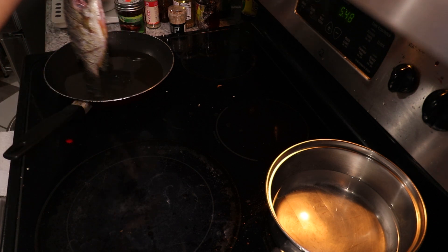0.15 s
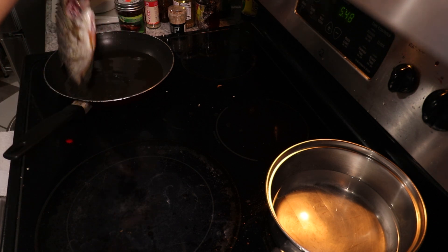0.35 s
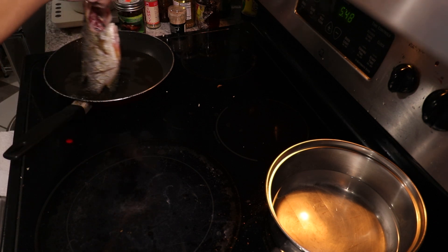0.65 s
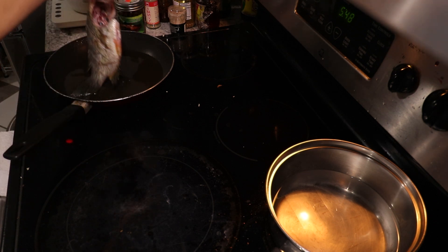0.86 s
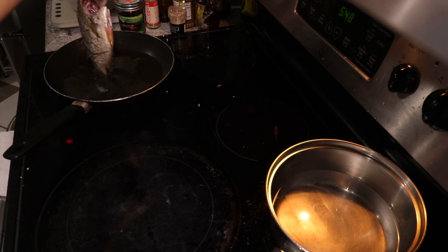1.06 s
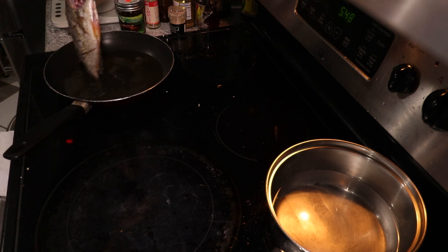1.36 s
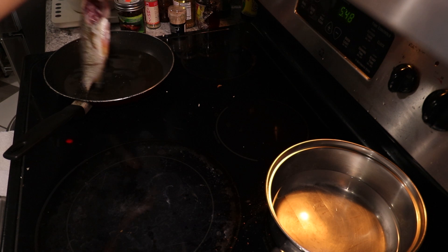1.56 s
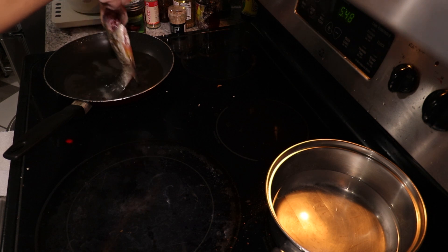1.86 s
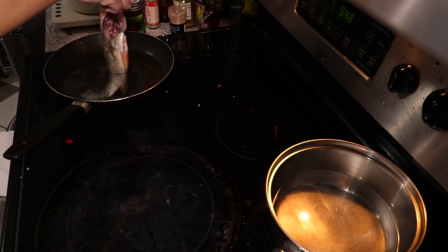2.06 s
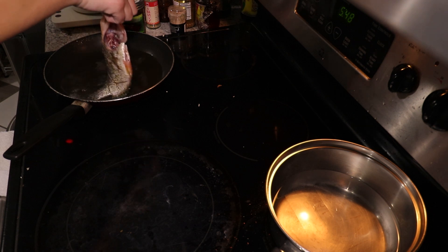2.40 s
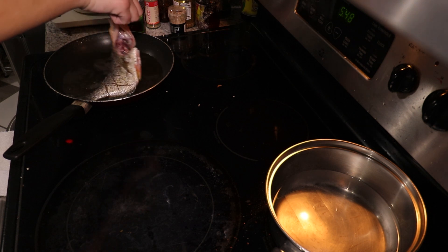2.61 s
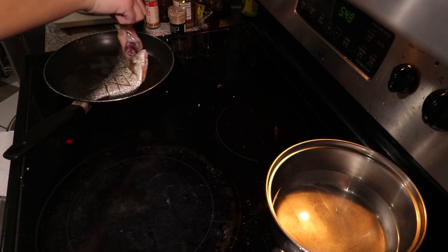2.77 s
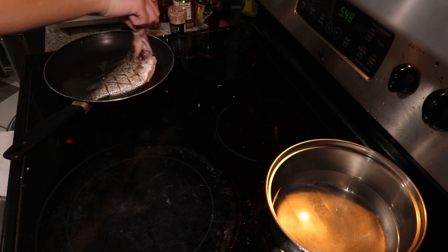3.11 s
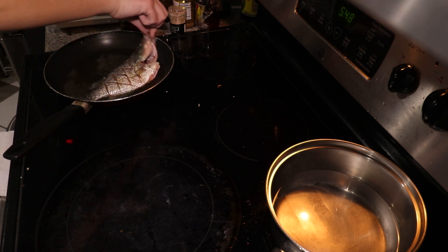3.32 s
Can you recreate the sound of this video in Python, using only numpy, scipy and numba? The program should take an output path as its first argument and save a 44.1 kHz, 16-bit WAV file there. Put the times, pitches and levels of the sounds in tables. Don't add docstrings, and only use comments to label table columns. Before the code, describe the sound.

Hot oil sizzles as a fish is lowered into a pan. Faint hiss and small ticks come first; from 0.5 to 1.35 s crackling swells with sharp pops, then nearly stops around 1.4-1.6 s. Scattered spits return, and at 1.95 s a loud sizzle surges and holds to the end at 3.4 s, with gurgling steam, dense bright snaps, slight metallic pan ring, short kitchen reflections and very faint hum.

```python
import sys
import numpy as np
from scipy import signal
from scipy.fft import rfft, irfft
from scipy.io import wavfile
from numba import njit

SR = 44100
rng = np.random.default_rng(int(sys.argv[2]) if len(sys.argv) > 2 else 0)


def level_to_linear(level):
    exponent = np.asarray(level, float) / 20
    return 10 ** exponent


def persist_wave(psi):
    counts = np.round(np.clip(psi, -1, 1) * 32767).astype(np.int16)
    wavfile.write(sys.argv[1], SR, np.atleast_2d(counts).T)


N = 152145
PLACES = 6

# start_s, level_db, pitch_hz, spread_octaves
SKIN_BOIL = [(0, -41, 3540, 0.63), (.13, -46, 6500, 0.75), (.25, -44, 6600, 0.085), (.45, -56, 5660, 0.08),
             (.575, -39, 3800, 0.6), (.9, -37, 3430, 0.38), (1.15, -38.5, 3970, 0.62),
             (1.24, -40.5, 5760, 0.7), (1.42, -56.5, 5130, 0.69), (1.58, -60, 4740, 0.22),
             (1.7, -45.5, 3120, 0.87), (1.86, -43, 4000, 0.63), (1.95, -30, 3060, 0.74),
             (2.2, -31.5, 4300, 0.54), (2.38, -34, 4200, 0.63), (2.6, -33, 3160, 0.74),
             (3.0, -34, 3580, 0.86), (3.45, -33.5, 3500, 0.85)]


def in_time(rows, t):
    s, *columns = np.transpose(rows)
    return [np.interp(t, s, c) for c in columns]


def rms_one(x):
    return x / np.sqrt(np.mean(x ** 2) + 1e-20)


def drift(rate_hz):
    r = np.exp(-2 * np.pi * rate_hz / SR)
    settle = 8000
    noise = rng.standard_normal(N + settle)
    return rms_one(signal.lfilter([1], [1, -2 * r, r * r], noise)[settle:])


@njit
def add(out, place, start, hz, size, cycles, rise):
    for k in range(len(start)):
        w = 2 * np.pi * hz[k] / SR
        n = int(cycles * SR / hz[k]) + 2
        fall = np.exp(-6.9 / n)
        swell = np.exp(-.7 * hz[k] / SR)
        level, unswollen, phase = size[k], 1.0, 0.0
        for i in range(min(n, out.shape[1] - start[k])):
            out[place[k], start[k] + i] += level * (1 - unswollen) * np.sin(phase)
            phase += w * (1 + rise * i / n)
            level *= fall
            unswollen *= swell


def volleys(s, db, hz, spread, dies_s, cycles, count):
    s, db, hz, spread = (np.broadcast_to(v, np.shape(s))[:, None] for v in (s, db, hz, spread))
    late = rng.exponential(1, (len(s), count)) * (np.arange(count) > count // 4)
    detune = np.clip(rng.standard_normal(late.shape), -1.5, 1.5)
    pitch = np.clip(hz * 2 ** (np.abs(spread) * detune), 200, .4 * SR)
    size = level_to_linear(db - 2.25 * late) * rng.choice([-1, 1], late.shape) / np.sqrt(count)
    start = np.clip((s + dies_s * late) * SR, 0, N - 1).astype(np.int64)
    place = np.repeat(np.arange(len(s)) % PLACES, count)
    out = np.zeros((PLACES, N))
    add(out, place, start.ravel(), pitch.ravel(), size.ravel(), cycles, .1)
    return out


def swarm(per_s, control, uneven_db, clump_db, cycles, crackle_db, dies_s, crackle_oct):
    out = 0
    for share, count, lift_db, most in (1, 1, 0, 3), (.03, 8, crackle_db, 1.6):
        t = rng.uniform(0, N / SR, int(share * per_s * N / SR))
        level_db, hz, spread = control(t)
        size_db = uneven_db * np.minimum(rng.exponential(1, len(t)), most)
        size_db = size_db + clump_db * drift(19)[(t * SR).astype(int)]
        hz = hz * 2 ** (np.abs(spread) * np.clip(rng.standard_normal(len(t)), -2, 2))
        even_db = 10 * np.log10(np.mean(level_to_linear(2 * size_db)) * per_s * cycles / 60 / hz)
        burst_db = level_db + size_db - even_db + lift_db
        out = out + volleys(t, burst_db, hz, crackle_oct * (count > 1), dies_s, cycles, count=count)
    return out


def sizzle():
    return swarm(5000, lambda t: in_time(SKIN_BOIL, t), uneven_db=6.0, clump_db=1.74, cycles=10.0,
                 crackle_db=15, dies_s=0.0033, crackle_oct=0.18)


def pocket():
    # start_s, level_db, pitch_hz
    pocket_curve = [(0, -53.5, 1380), (.2, -71, 1230), (.52, -88, 1200), (.6, -51, 1110), (1.02, -41, 1210),
                    (1.12, -56, 1300), (1.6, -81, 1140), (1.85, -61, 1130), (1.95, -48.5, 1470),
                    (2.12, -32, 1120), (2.25, -37, 1010), (2.35, -41, 900), (2.47, -43.5, 1160),
                    (2.7, -39.5, 1510), (3.33, -40, 1284), (3.345, -25, 1540), (3.45, -29.5, 1300)]
    spread_oct = 0.16
    return swarm(700, lambda t: in_time(pocket_curve, t) + [spread_oct], uneven_db=4, clump_db=2.5,
                 cycles=14.0, crackle_db=6, dies_s=.005, crackle_oct=.15)


def mist():
    # start_s, level_db
    mist_curve = [
        (0.0, -48.5),
        (0.39, -56),
        (0.83, -46.5),
        (1.16, -49.5),
        (1.41, -66),
        (1.66, -56),
        (2.12, -45),
        (2.71, -43.5),
        (3.45, -48.5),
    ]
    pitch_hz, spread_oct = 10600, 0.53
    return swarm(9000, lambda t: in_time(mist_curve, t) + [pitch_hz, spread_oct], uneven_db=-1.5,
                 clump_db=-2.5, cycles=10.0, crackle_db=16, dies_s=0.0045, crackle_oct=0.15)


def simmer():
    def boil(t):
        level_db = -58 + 1.5 * (in_time(SKIN_BOIL, t)[0] + 35)
        return [level_db, 420, .25]
    return swarm(700, boil, uneven_db=0.0, clump_db=3.0, cycles=10.0,
                 crackle_db=-6.0, dies_s=0.0047, crackle_oct=0.16).sum(axis=0)


def room_tone():
    # pitch_hz, level_db
    hush_colour = [(15, -40), (25, -1.5), (317, -1.5), (1700, -8), (2350, -8), (5570, -4.5), (10700, -41),
                   (14000, -7), (16000, -19)]
    hz, db = np.transpose(hush_colour)
    f = np.fft.rfftfreq(N, 1 / SR) + 1
    colour = level_to_linear(np.interp(np.log(f), np.log(hz), db))
    return level_to_linear(-57) * rms_one(irfft(rfft(rng.standard_normal(N)) * colour, N))


def pops():
    # start_s, peak_db,
    # pitch_hz, spread_octaves
    water_drops = [(0.096, -7.5, 4770, 0.6), (0.138, -4.5, 8300, 0.33), (0.518, -7.5, 9400, 0.28),
                   (0.536, -16, 7500, 0.3), (0.579, -6, 3180, 0.43), (0.636, -10.5, 2070, 0.34),
                   (0.666, -6.5, 3520, 0.28), (0.691, -3.5, 8900, 0.28), (0.742, -9, 3000, 0.59),
                   (0.762, -7, 4500, 0.43), (0.807, -14, 1270, 0.2), (0.852, -7.5, 1230, 0.33),
                   (0.897, -7, 2870, 0.32), (0.967, -18, 1210, 0.39), (1.015, -12, 3200, 0.51),
                   (1.089, -2.5, 3170, 0.1), (1.117, -12, 7000, 0.3), (1.161, -8, 2840, 0.56),
                   (1.196, 4, 5400, 0.31), (1.325, -16, 4460, 0.23), (1.346, 1, 3130, 0.28),
                   (1.628, -8, 2840, 0.34), (1.684, -6, 2860, 0.54), (1.763, -13.5, 3180, 0.7),
                   (1.777, -17, 3180, 0.58), (1.833, -14.5, 2420, 0.2),
                   (1.878, -9.5, 3150, 0.33), (1.902, -15, 2900, 0.28), (1.923, 0, 2420, 0.34),
                 (1.954, 1, 2420, 0.58), (2.003, -5.5, 2420, 0.7), (2.029, -6.5, 1330, 0.5),
                 (2.0992, 2.5, 3720, 0.57), (2.111, -11, 1216, 0.42), (2.209, 1, 1090, 0.2),
                 (2.258, 0.5, 3680, 0.33), (2.294, -10, 2390, 0.16), (2.355, -6, 3000, 0.29),
                 (2.452, -4, 2290, 0.37), (2.534, -5, 3050, 0.38), (2.567, -5, 1990, 0.45),
                 (2.581, -2, 2640, 0.5), (2.605, -1, 2740, 0.56), (2.629, -3, 4420, 0.55),
                 (2.673, 0.5, 2380, 0.55), (2.732, -15, 2070, 0.39), (2.818, 0.5, 4630, 0.36),
                 (2.892, -30, 5600, 0.34), (2.94, -14, 2950, 0.21), (2.986, 3.5, 1570, 0.41),
                 (3.093, -5, 4500, 0.2), (3.19, 1.5, 3100, 0.41), (3.266, -4.5, 2860, 0.39),
                 (3.339, 4, 1800, 0.35)]
    # start_s, peak_db, pitch_hz
    tick_drops = [
        (0.1381, -24, 8090),
        (0.5177, -23, 8850),
        (0.6908, -20, 7700),
        (1.1972, -19, 6100),
        (1.348, -3, 6300),
        (2.0712, -25, 8310),
        (2.0986, -21, 6700),
        (2.189, -23, 6600),
        (2.816, 0, 6500),
        (3.0944, -1, 6430),
    ]
    # start_s, peak_db, pitch_hz
    spit_drops = [(0.0253, -37, 15500), (0.5202, -28, 12900), (0.7083, -7, 11600), (0.7502, -15, 14900),
                  (1.1972, -32, 11000), (2.0677, -34, 11700), (2.136, -31, 11400), (2.4648, -31, 12800),
                  (2.565, -25, 14100), (2.6733, -24, 11200), (2.7287, -26, 13800), (2.8943, -23, 13800),
                  (3.2755, -21, 11800)]
    tiny_oct = .22
    spits = [(s, db + 6, hz) for s, db, hz in spit_drops]
    tiny = [(*row, tiny_oct) for row in [*tick_drops, *spits]]
    s, db, hz, spread = np.transpose([*water_drops, *tiny])
    return volleys(s, db - 9 + 8.5, hz, spread, dies_s=.003, cycles=11.6, count=16)


def snaps():
    # start_s, peak_db, pitch_hz
    skin_cracks = [(0.0773, -24.5, 4900), (0.0979, -21.5, 4800), (0.1393, -13.5, 8020), (0.519, -25, 7680),
                   (0.5786, -19, 3070), (0.6358, -14.5, 4400), (0.6687, -18.5, 3600), (0.7426, -14.5, 3030),
                   (0.7627, -14.5, 3920), (0.8082, -21, 2660), (0.8536, -16.5, 2100), (0.9686, -21.5, 2300),
                   (1.0161, -22.5, 2760), (1.0901, -22.5, 3200), (1.0982, -23, 3660), (1.2015, -11, 4700),
                   (1.3035, -25, 5900), (1.3253, -22, 4720), (1.3483, -16.5, 4570), (1.356, -23, 3380),
                   (1.6285, -22.5, 2780), (1.6845, -15.5, 1900), (1.7767, -13.5, 4070),
                   (1.8334, -28.5, 2860), (1.8816, -16, 5030), (1.8945, -14, 3800), (1.9076, -16, 3190),
                   (1.9248, -16.5, 2520), (1.9513, -17, 2780), (1.9621, -13, 2330), (2.0029, -10, 3130),
                   (2.0307, -12.5, 2120), (2.0498, -17, 1620), (2.1031, -7, 3520), (2.1108, -12, 1460),
                   (2.2131, -16, 1630), (2.2338, -9.5, 2870), (2.2619, -5, 4060), (2.295, -13.5, 2640),
                   (2.5348, -13.5, 2870), (2.5818, -13, 2970), (2.6273, -7.5, 4600), (2.6746, -7.5, 3600),
                   (2.8187, -9, 4900), (2.8258, -12, 4330), (2.8956, -14.5, 3600), (2.9414, -18, 2700),
                   (2.9873, -7.5, 1480), (2.9937, -15, 1750), (3.0941, -6, 4700), (3.1441, -8, 4250),
                   (3.2698, -11, 3170), (3.276, -12, 3520), (3.3403, -8, 2020), (3.3565, -8.5, 2260),
                   (3.42, -16, 1830)]
    s, db, hz = np.transpose(skin_cracks)
    split_hz, snap_gain_db = 2500, 20
    out = np.zeros((PLACES, N))
    place = np.arange(len(s)) % PLACES
    start = (s * SR).astype(np.int64)
    large = level_to_linear(db + snap_gain_db) * (hz <= split_hz)
    small = level_to_linear(db + 13) * (hz > split_hz)
    thud_db = db + snap_gain_db - 24 - 5 * np.log2(hz / split_hz)
    add(out, place, start, hz, large, 3.0, 0.)
    add(out, place, start, hz, small, 6.0, 0.)
    add(out, place, start, hz * .25, level_to_linear(thud_db), 3.5, 0.)
    return out


def gulps():
    # start_s, peak_db, pitch_hz
    steam_gulps = [
        (0.992, -21, 1150),
        (1.04, -22, 1100),
        (2.048, -14, 1150),
        (2.165, -12, 1050),
        (2.182, -13, 1030),
        (2.232, -9, 2750),
        (2.315, -15, 880),
        (2.425, -18, 1100),
        (2.49, -15, 1300),
        (3.28, -12, 2850),
    ]
    s, db, hz = np.transpose(steam_gulps)
    return volleys(s, db, hz, .12, dies_s=.004, cycles=13.0, count=10)


def hum():
    t = np.arange(N) / SR
    on_s, fade_s, hum_hz = 2.02, 0.051, 120
    fade_in = np.clip((t - on_s) / fade_s, 0, 1)
    return level_to_linear(-64) * np.sqrt(2) * fade_in * np.sin(2 * np.pi * hum_hz * t)


def pan(x):
    # pitch_hz, width_hz, level_db
    steel_modes = [(617, 21, 0.5), (1380, 33, -64), (2420, 43, -12), (2860, 117, -4.5), (4300, 95, -25),
                   (5614, 150, -9), (6750, 330, -13.5), (8050, 430, -7.5), (11700, 130, -53)]
    out = x.copy()
    for hz, width_hz, db in steel_modes:
        r = np.exp(-np.pi * width_hz / SR)
        drive = (1 - r * r) / 2 * np.array([1, 0, -1])
        ring = [1, -2 * r * np.cos(2 * np.pi * hz / SR), r * r]
        out += level_to_linear(1 + db / 2) * signal.lfilter(drive, ring, x)
    return out


def kitchen(x):
    t60_s, rise_s, wall_cut_hz, echo_s = 0.32, 0.00081, 21600, .0046
    t = np.arange(SR // 2) / SR
    tail = rng.standard_normal((PLACES, len(t))) * level_to_linear(-60 * t / t60_s) * np.clip(t / rise_s, 0, 1)
    filtered_tail = signal.lfilter(*signal.butter(1, wall_cut_hz, fs=SR), tail)
    reply = level_to_linear(-4) * filtered_tail / np.sqrt(np.sum(filtered_tail ** 2) / PLACES)
    reply[:, 0] = 1
    echo_at = (echo_s * SR * np.linspace(.85, 1.15, PLACES)).astype(int)
    reply[np.arange(PLACES), echo_at] += level_to_linear(-7.5)
    heard = signal.fftconvolve(x, reply, axes=1)[:, :N].sum(axis=0)
    return heard / np.sqrt(np.sum(reply ** 2) / PLACES)


def scene():
    bursts = sizzle() + pocket() + mist() + pops() + snaps() + gulps()
    oil = pan(kitchen(bursts))
    oil = signal.sosfilt(signal.butter(2, 330, "high", fs=SR, output="sos"), oil)
    return (oil + simmer() + room_tone() + hum())[None]


def band_limit(x):
    return signal.sosfilt(signal.butter(12, 16640, fs=SR, output="sos"), x)


def record(dry):
    x = signal.sosfilt(signal.cheby2(18, 32, 15850, fs=SR, output="sos"), dry)
    x = signal.sosfilt(signal.cheby2(14, 40, 16650, fs=SR, output="sos"), x)
    return band_limit(x)


dry = scene()
out = record(dry)
persist_wave(out)
```